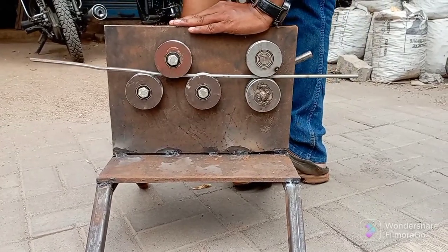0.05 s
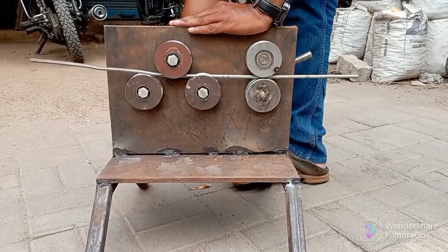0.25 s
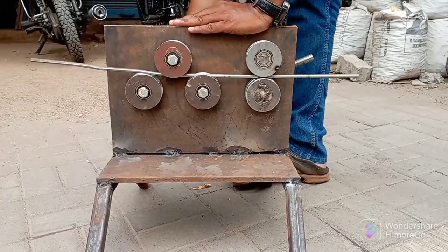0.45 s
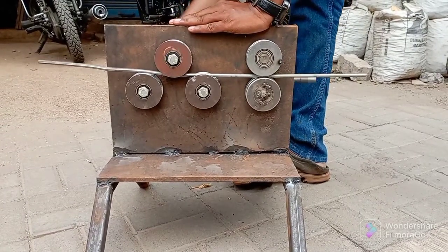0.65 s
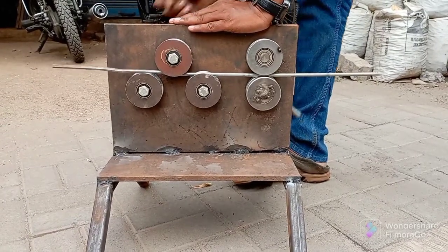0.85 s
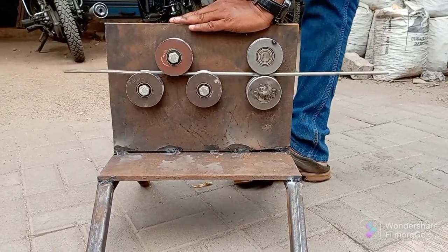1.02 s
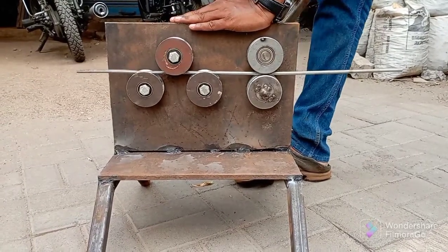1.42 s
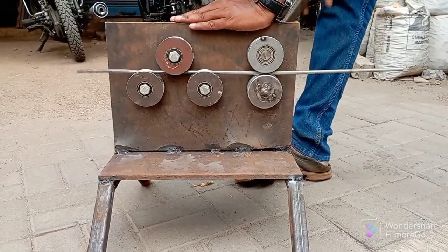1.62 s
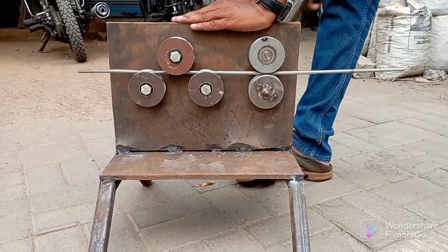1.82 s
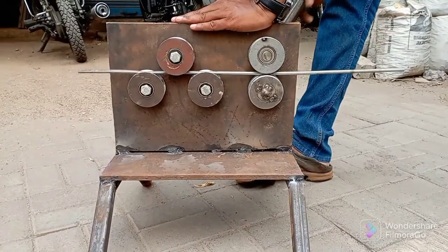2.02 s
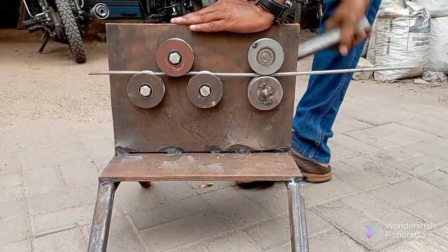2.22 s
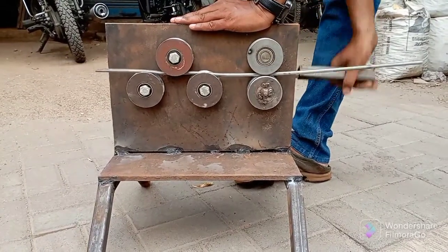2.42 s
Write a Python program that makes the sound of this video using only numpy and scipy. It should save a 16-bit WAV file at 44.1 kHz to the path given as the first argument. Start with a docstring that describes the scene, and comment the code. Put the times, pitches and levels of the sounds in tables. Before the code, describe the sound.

Metal rattles and clanks on a nearby rod straightener. The rod scrapes faintly, the steel plate booms, a roller squeaks once, and the loose handle clinks before a ringing clank echoes away over a faint low rumble.

```python
"""Straightening a steel rod in a reverberant hall

A rod scrapes through the rollers of a hand-cranked straightener over a low background murmur.
Knocks drive the modes of a steel sheet, and the boom dies away. A roller squeaks once by stick-slip
friction, the loose handle clinks on its shaft, and a bright clank reverberates round the walls.
Two spaced microphones hear the scene."""
import sys
import numpy as np
from scipy import signal
from scipy.fft import rfft, irfft
from scipy.io import wavfile

SR = 44100
rng = np.random.default_rng(int(sys.argv[2]) if len(sys.argv) > 2 else 0)


def wav_record(signal):
    """Record a signal, one row per channel, as 16-bit PCM in the file named by sys.argv[1]."""
    frames = np.transpose(np.atleast_2d(signal))
    bounded = np.clip(frames, -1, 1)
    # unit amplitude maps onto the largest positive 16-bit level
    quanta = np.round(bounded * 32767).astype(np.int16)
    wavfile.write(sys.argv[1], SR, quanta)


N = 112454
N_FFT = 2 ** 17
TIME, FREQ = np.arange(N) / SR, np.fft.rfftfreq(N_FFT, 1 / SR)


def amp(db):
    """Amplitude ratio of a level in decibels."""
    return 10 ** (np.asarray(db) / 20)


def at(points, hz):
    """Interpolation of (f/Hz, value) points on a logarithmic frequency axis."""
    f, values = np.array(points, float).T
    return np.interp(np.log(np.maximum(hz, 1)), np.log(f), values)


def wave(spectrum):
    """Inverse Fourier transform, cut to the length of the scene."""
    return irfft(spectrum)[..., :N]


def unit(x):
    """Normalisation to an rms of 1."""
    return x / np.sqrt(np.mean(x ** 2))


def wander(bandwidth_hz):
    """Low-pass Gaussian noise: a smooth random fluctuation with an rms of 1."""
    return unit(wave(rfft(rng.standard_normal(N_FFT)) * np.exp(-(FREQ / bandwidth_hz) ** 2)))


def decay(t60):
    """Exponential damping: the level falls 60 dB in t60 seconds."""
    return np.exp(-np.log(1000) * TIME / t60)


def add(out, start, x):
    """Superposition of a stereo sound from a start time onward."""
    i = int(np.clip(start * SR, 0, N - 1))
    out[:, i:] += x[:, :N - i]


def diffuse(colour, right_lag_s=0, tilt_db=0, spacing_m=0.091, direct_share=0.083):
    """Noise in a mostly diffuse field: coherence between two microphones falls as a sinc of frequency."""
    a, b = rfft(rng.standard_normal((2, N_FFT)))
    coherence = direct_share + (1 - direct_share) * np.sinc(2 * FREQ * spacing_m / 343)
    mid, side = a * np.sqrt(1 + coherence), b * np.sqrt(np.maximum(1 - coherence, 0))
    pair = np.array([mid + side, (mid - side) * np.exp(-2j * np.pi * FREQ * right_lag_s)])
    octaves = np.log2(np.maximum(FREQ, 1) / SR)
    return unit(wave(pair * amp(at(colour, FREQ) + tilt_db * octaves)))


def fade(x, t60s):
    """Frequency-dependent damping: each octave band has its own decay time."""
    centres = 62.5 * 2 ** np.arange(9)
    spectrum, out = rfft(x, N_FFT), 0
    for hz, share in zip(centres, np.eye(len(centres))):
        band = wave(spectrum * at(np.c_[centres, share], FREQ))
        out = out + band * decay(at(t60s, hz))
    return out


def ring(mode_hz, mode_db, mode_t60, scatter_db=1.2):
    """Free vibration: a sum of damped modes, weighted a little differently per blow and microphone."""
    out, n = np.zeros((2, N)), N // 3
    for hz, db, t60 in zip(mode_hz, mode_db, mode_t60):
        gains = amp(db + scatter_db * rng.standard_normal((2, 1)))
        out[:, :n] += gains * np.sin(2 * np.pi * (hz * TIME[:n] + rng.random())) * decay(t60)[:n]
    return out


# Spectra of the murmur and of the fading noise: f/Hz, relative level/dB
MURMUR_SPECTRUM = [(25, 0.5), (40, 2), (52, -8), (61, 11), (72, 4), (105, -2.5), (160, 1), (250, -6.5),
                   (420, -7), (650, -15), (1200, -21), (2200, -20), (3200, -26.5), (5000, -28), (7000, -28),
                   (8700, -31), (9400, -27), (10000, -32.5), (11000, -38), (13000, -46), (15500, -48)]
TAIL_SPECTRUM = [(60, -31), (150, 7.5), (330, 6.5), (700, -11), (2200, -15.5), (4500, -23.5), (9000, -21),
                 (12000, -34), (15000, -44)]
TAIL_T60 = [(150, 6.6), (2000, 3.5), (12000, 1.3)]  # f/Hz, T60/s


def background(murmur_db=-41, wander_db=0.77, tail_db=-36, right_lag_s=-.0003):
    """Ambient noise: background murmur and hiss, with the reverberant tail of an earlier noise."""
    murmur = amp(murmur_db + wander_db * wander(2)) * diffuse(MURMUR_SPECTRUM, right_lag_s)
    tail = amp(tail_db) * fade(diffuse(TAIL_SPECTRUM, right_lag_s), TAIL_T60)
    return murmur + tail


# Strokes of the rod: t/s, duration/s, level/dB, spectral tilt/(dB per octave)
ROD_STROKES = [(0.032, 0.022, -49.5, 0), (0.627, 0.066, -48, -3.5), (.885, 0.024, -62.5, 1.5),
               (1.411, 0.016, -50, 2.5), (1.435, 0.019, -67, -6)]
# Spectrum of the rod's contact noise: f/Hz, relative level/dB
CONTACT_SPECTRUM = [(300, -16), (1500, 1.5), (2300, 7), (4500, -0.5), (7000, 7), (9500, 5.5), (12000, -1),
                    (15000, -15)]


def scrapes(release_s=0.075, grain_db=-1.5):
    """Sliding friction: the rod gives short strokes of noise, made gritty by fast level fluctuations."""
    out = 0
    for start, length, db, tilt_db in ROD_STROKES:
        attack = np.clip(2 * (TIME - start) / length, 0, 1)
        release = np.exp(-np.maximum(TIME - start - length, 0) / release_s)
        grit = unit(diffuse(CONTACT_SPECTRUM, tilt_db=tilt_db) * amp(grain_db * wander(400)))
        out = out + amp(db) * attack * release * grit
    return out


# Whines of the rod: t/s, duration/s, f/Hz, level/dB
ROD_WHINES = [(0.038, 0.022, 6000, -47), (0.043, 0.073, 1400, -48.5), (0.88, 0.036, 2150, -51.5)]


def whines(jitter=.02):
    """Friction-excited vibration: the rod sings a faint, wavering note as it starts to slide."""
    out = 0
    for start, length, hz, db in ROD_WHINES:
        phase = 2 * np.pi * np.cumsum(hz * (1 + jitter * wander(180))) / SR
        arch = np.sin(np.pi * np.clip((TIME - start) / length, 0, 1))
        out = out + amp(db) * arch * np.sin(phase)
    return out


# Dull knocks on the sheet: t/s, relative level/dB, f/Hz
SHEET_KNOCKS = [(.236, -22.5, 146), (0.281, -28.5, 154), (.358, -12.5, 245), (0.365, -13.5, 130.3),
                (0.38, -9, 178), (.394, -11, 219), (.418, -17, 378), (.437, -12, 118), (0.461, -13.5, 349),
                (.472, -8.5, 225), (0.539, -18.5, 297), (0.552, -19, 134), (.568, -20, 139),
                (0.62, -18.5, 235), (.675, -24, 206), (0.783, -24, 204), (.865, -26.5, 209)]
# Modes of the sheet, one list each: f/Hz, relative level/dB, T60/s
SHEET_F = [112, 163, 214, 232, 296, 346, 384, 432, 463]
SHEET_LEVEL = [-47, -55.5, -58, -72, -67, -65, -46, -35, -56]
SHEET_T60 = [0.77, 0.9, 0.28, .5, 0.59, .4, 0.32, 0.66, .4]
# Spectrum of the boom in the hall: f/Hz, relative level/dB
BOOM_SPECTRUM = [(40, -10), (60, -37), (105, -13.5), (220, -0.5), (300, -3), (460, -8), (660, -17),
                 (950, -18), (1400, -27.5), (2500, -28.5), (5000, -41), (9000, -44.5), (12000, -60),
                 (15000, -75)]
# Decay of the boom: f/Hz, T60/s
BOOM_DECAY = [(100, 3.3), (260, 1.3), (700, 1.25), (2000, 1.05), (5000, 0.62), (12000, 0.99)]


def rattle(knock_db=-1, peak_cycles=.75, boom_db=-20.5, boom_rise_s=.012, right_lag_s=.00034):
    """Forced vibration: soft knocks drive the modes of a steel sheet, and the hall reverberates."""
    knocks = np.zeros(N)
    for start, db, hz in SHEET_KNOCKS:
        cycles = np.maximum(TIME - start, 0) * hz
        envelope = cycles / peak_cycles * np.exp(1 - cycles / peak_cycles)
        knocks += amp(db + knock_db) * envelope * np.sin(2 * np.pi * cycles)
    response = ring(SHEET_F, SHEET_LEVEL, SHEET_T60) / 10
    sheet = signal.fftconvolve(knocks[None], response, axes=1)[:, :N]
    out = sheet + np.array([knocks, np.interp(TIME - right_lag_s, TIME, knocks)])
    boom = amp(boom_db) * fade(diffuse(BOOM_SPECTRUM, right_lag_s), BOOM_DECAY)
    rise = 1 - np.exp(-TIME / boom_rise_s)
    add(out, start=.357, x=boom * rise)
    return out


# Ticks of the rod: t/s, level/dB
ROD_TICKS = [(1.1759, -38), (2.44, -49), (2.469, -47), (2.477, -48)]


def ticks():
    """Contact transients: the rod clicks against the rollers in heavily damped bursts of noise."""
    out = np.zeros((2, N))
    for start, db in ROD_TICKS:
        add(out, start, amp(db) * diffuse(CONTACT_SPECTRUM, tilt_db=1.5) * decay(t60=0.048))
    return out


# Course of the squeak: t/s, f/Hz, level/dB
SQUEAK_CONTOUR = [(1.203, 3170, -55), (1.208, 3130, -34), (1.216, 3150, -27), (1.223, 3165, -20.5),
                  (1.229, 3200, -20), (1.234, 3235, -31), (1.241, 3200, -50)]
# Harmonics 2 to 4 at the peak of the squeak: level/dB relative to the fundamental
SQUEAK_HARMONICS = [-22, -27, -37]


def squeak(jitter=.013, flutter_db=4, right_excess_db=3):
    """Stick-slip oscillation: a roller squeaks on its axle, richer in harmonics as it swells."""
    times, hz, db = np.array(SQUEAK_CONTOUR).T
    swell = np.interp(TIME, times, amp(db), left=0, right=0)
    pitch = np.interp(TIME, times, hz) * (1 + jitter * wander(640))
    phase = 2 * np.pi * np.cumsum(pitch) / SR
    overtones = sum(amp(level + flutter_db * wander(150)) * np.sin(k * phase)
                    for k, level in enumerate(SQUEAK_HARMONICS, 2))
    tone = np.sin(phase) + overtones * np.sqrt(swell / swell.max())
    return tone * swell * amp(np.array([[-1], [1]]) * right_excess_db / 2)


# Blows of the handle: t/s, then relative level/dB of handle, roller, rod and crack
HANDLE_BLOWS = [(1.592, -78, -43, -35, -39), (1.707, -40.5, -53, -35, -39),
                (1.729, -45, -40.5, -42.5, -44.5), (1.7705, -28, -44, -39, -31),
                (1.7943, -30.5, -23.5, -40, -26.5), (1.809, -53, -44, -39.5, -32)]
# Modes of handle, roller and rod, three lists each: f/Hz, relative level/dB, T60/s
HANDLE_F = [2080, 2900, 3780, 4935, 5000, 6010, 6600, 7130, 7320, 8990, 10600, 12078]
HANDLE_LEVEL = [-16, -7.5, -29, -3.5, -9, -7, -12, -0.5, -12, -12, -11, -6]
HANDLE_T60 = [.12, .12, .1, .07, .07, .08, .08, .075, .06, .06, .08, .075]
ROLLER_F = [1025, 1620, 2990, 3155, 5750, 5940, 6790, 8300, 9030, 9400, 9750, 10620, 14050]
ROLLER_LEVEL = [-9, -16, -6.5, -14.5, -8, -13, -20, -17, -5, -10, -9, -7.5, -28]
ROLLER_T60 = [.1, .1, .08, .18, .1, .15, .13, .1, .1, .09, .11, .11, .08]
ROD_F = [620, 790, 1400, 2080, 3000, 4890, 6450, 8700, 9150, 11590]
ROD_LEVEL = [-9, -9, -14.5, -13, -13, -9.5, -10, -8.5, -14, -13]
ROD_T60 = [.14, .14, .1, .1, .08, .11, .08, .06, .1, .09]
# Spectrum of the crack: f/Hz, relative level/dB
CRACK_SPECTRUM = [(100, -21), (300, -6.5), (700, -4.5), (1500, -3), (4000, -4), (6000, 4.5), (9500, -0.5),
                  (12000, -4.5), (15500, -12.5)]
# Decay of the crack: f/Hz, T60/s
CRACK_DECAY = [(500, 0.31), (4000, 0.15), (14000, 0.076)]


def clinks(rise_s=0.00089, bite_db=1, bite_s=.003):
    """Impact excitation: the loose handle hits its shaft with a crack; handle, roller and rod ring."""
    out = np.zeros((2, N))
    rise = 1 - np.exp(-TIME / rise_s)
    bite = 1 + amp(bite_db) * np.exp(-TIME / bite_s)  # brief emphasis of the attack
    for start, handle_db, roller_db, rod_db, crack_db in HANDLE_BLOWS:
        handle = amp(handle_db) * ring(HANDLE_F, HANDLE_LEVEL, HANDLE_T60)
        roller = amp(roller_db) * ring(ROLLER_F, ROLLER_LEVEL, ROLLER_T60)
        rod = amp(rod_db) * ring(ROD_F, ROD_LEVEL, ROD_T60)
        crack = amp(crack_db) * fade(diffuse(CRACK_SPECTRUM), CRACK_DECAY)
        add(out, start, (handle + roller + rod + crack) * rise * bite)
    return out


# Landing and bounces of the steel: t/s, level/dB
STEEL_BLOWS = [(2.057, -22), (2.076, -22.5), (2.094, -26)]
# Modes of the steel, one list each: f/Hz, relative level/dB, T60/s
STEEL_F = [2030, 2140, 2207, 2255, 6932, 7110]
STEEL_LEVEL = [-20, -15, -14, -19, -18, -20]
STEEL_T60 = [.5, .55, .6, .55, .4, .4]
# Spectrum of the wash from the walls: f/Hz, relative level/dB
WASH_SPECTRUM = [(50, -20), (110, 0.5), (250, -1.5), (460, -5.5), (600, -8), (1150, -8), (1500, -5.5),
                 (1800, -4), (2200, -2.5), (2800, -6.5), (3600, -11), (4500, -6.5), (5300, -12), (7000, -7),
                 (8200, -11.5), (9700, -7.5), (12000, -21), (15000, -33)]
# Decay of the wash: f/Hz, T60/s
WASH_DECAY = [(120, 2.2), (400, 2.2), (1000, 0.92), (2200, 0.52), (4500, 0.57), (8000, 0.36), (14000, .3)]


def clank(rise_s=0.0037):
    """Reverberation of an impact: steel lands and bounces twice, heard mostly as a wash from the walls."""
    out = np.zeros((2, N))
    rise = 1 - np.exp(-TIME / rise_s)
    for start, db in STEEL_BLOWS:
        wash = fade(diffuse(WASH_SPECTRUM, right_lag_s=-.00027), WASH_DECAY)
        modes = ring(STEEL_F, STEEL_LEVEL, STEEL_T60)
        add(out, start, amp(db) * rise * (wash + modes))
    return out


HALL_T60 = [(300, 0.3), (3000, 0.17), (7000, 0.38), (14000, 0.19)]  # f/Hz, T60/s


def hall_echo(near, level_db=-12.5):
    """Diffuse reflection: near sounds are convolved with a decaying noise response of unit energy."""
    response = unit(fade(rng.standard_normal((2, N)), HALL_T60)) / np.sqrt(N)
    return amp(level_db) * signal.fftconvolve(near, response, axes=1)[:, :N]


def scene():
    """Superposition of the nearby machine, its echo, the rattle, the clank and the background."""
    near = clinks() + squeak() + scrapes() + whines() + ticks()
    return near + hall_echo(near) + rattle() + clank() + background()


# Imbalance of the microphones, the right being brighter: f/Hz, left minus right level/dB
MIC_IMBALANCE = [(300, -.6), (1500, -0.4), (2500, -1.5), (4000, -5.5), (6000, -5.5), (8000, -11),
                 (10000, 0.5), (14000, -0.5)]


def record(dry, low_cut_hz=60, top_hz=15600):
    """Frequency response: the microphones differ in the treble; steep filters cut rumble and top."""
    low_cut = 1 / np.sqrt(1 + (low_cut_hz / np.maximum(FREQ, 1)) ** 10)
    balance = amp(np.array([[1], [-1]]) * at(MIC_IMBALANCE, FREQ) / 2)
    coloured = wave(rfft(dry, N_FFT) * low_cut * balance)
    high_cut = signal.ellip(10, .2, 80, top_hz, fs=SR, output="sos")
    return signal.sosfilt(high_cut, coloured)


dry = scene()
out = record(dry)
wav_record(out)
```